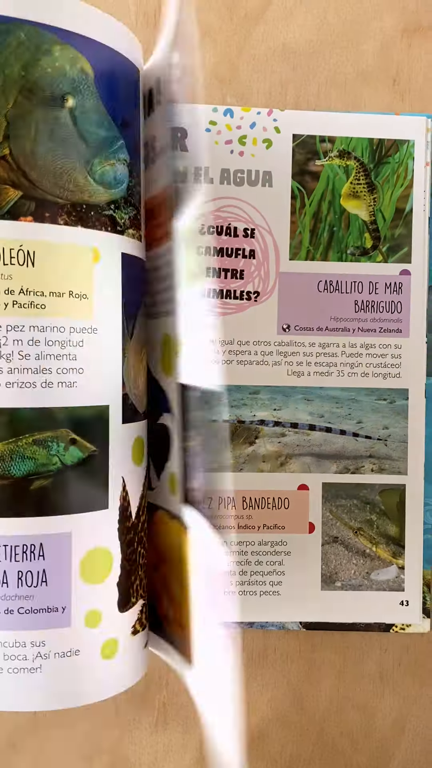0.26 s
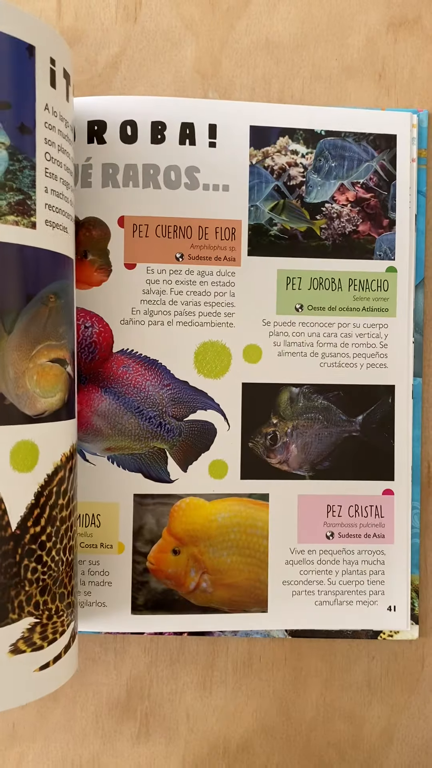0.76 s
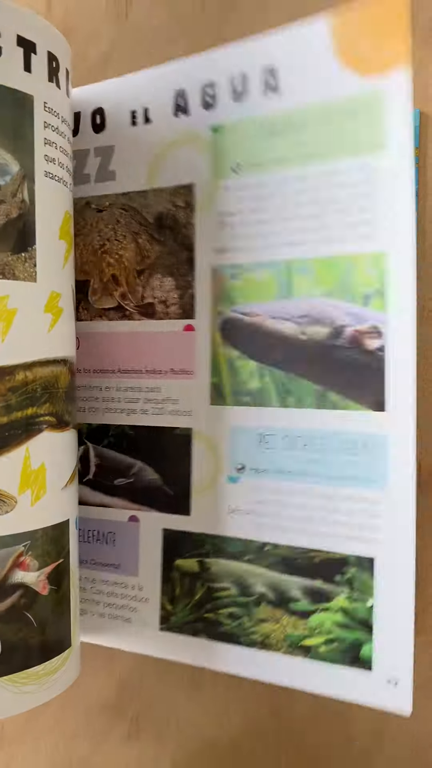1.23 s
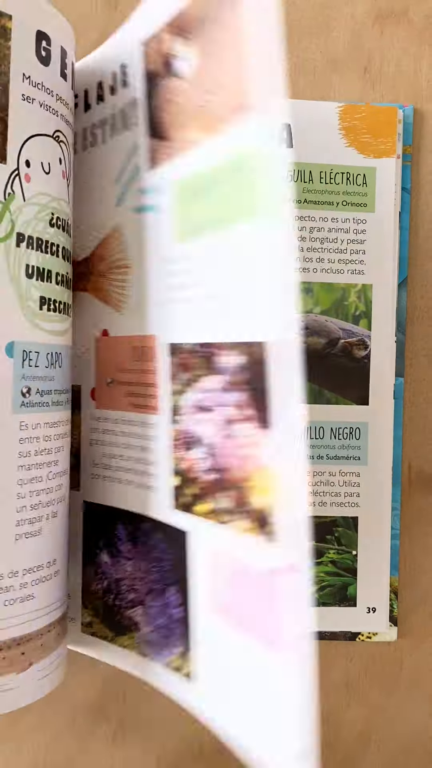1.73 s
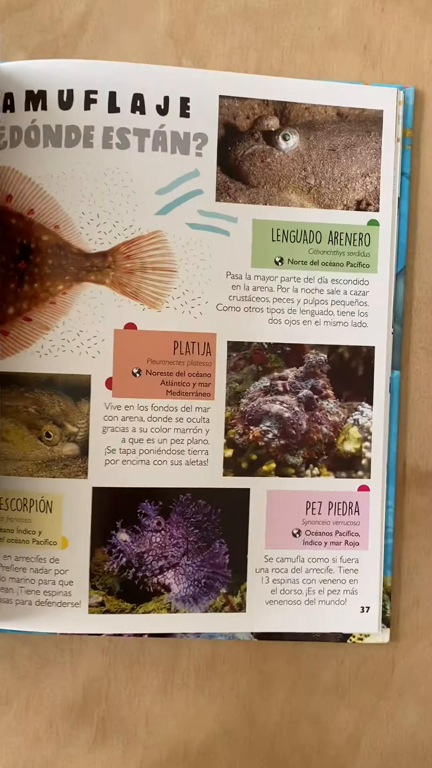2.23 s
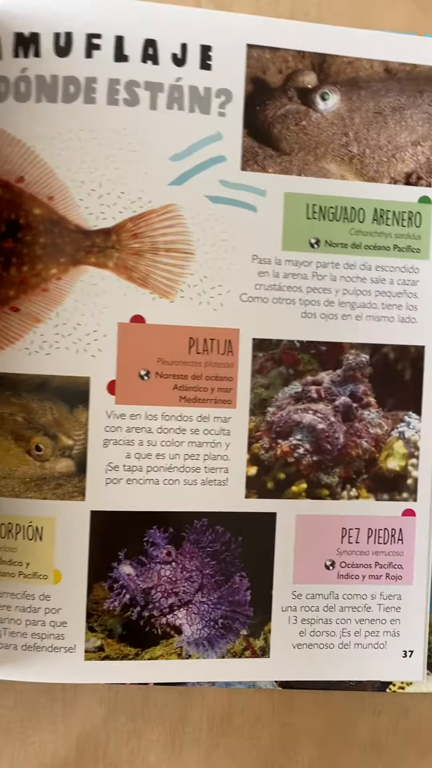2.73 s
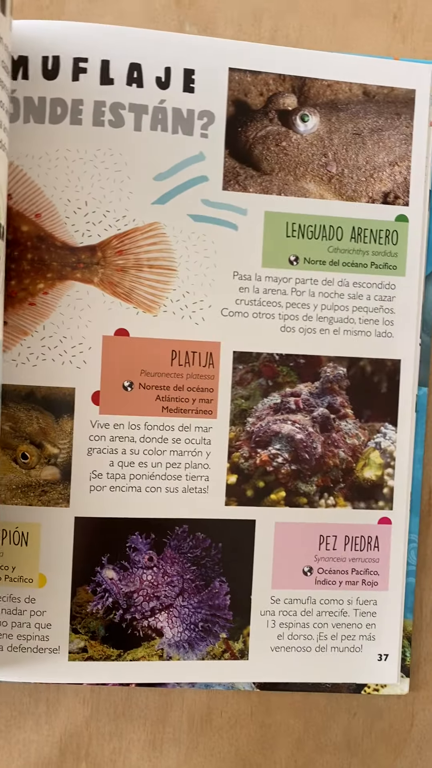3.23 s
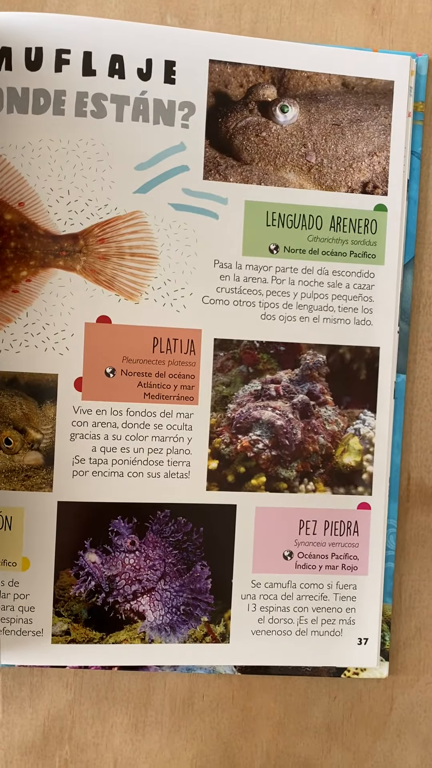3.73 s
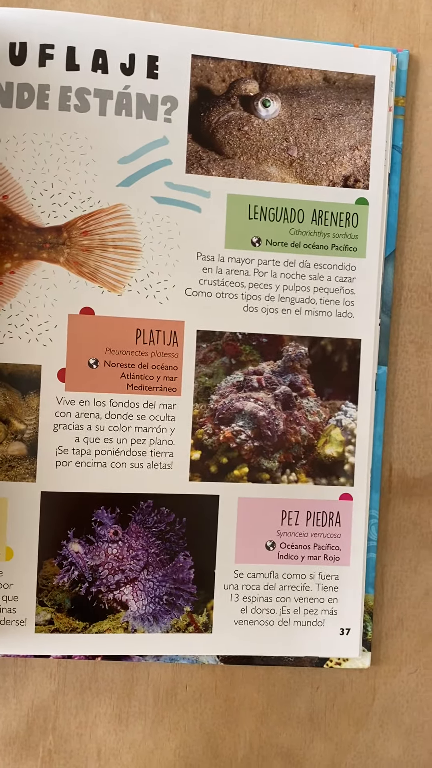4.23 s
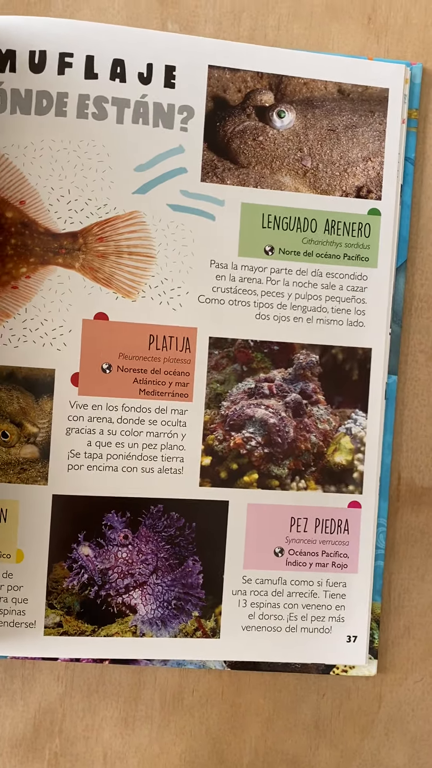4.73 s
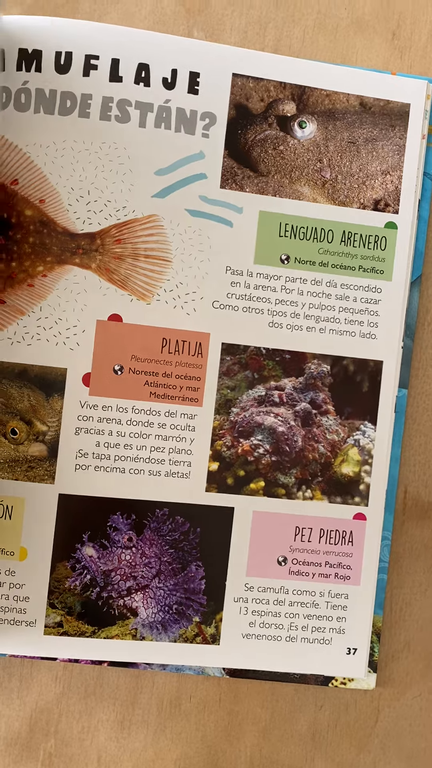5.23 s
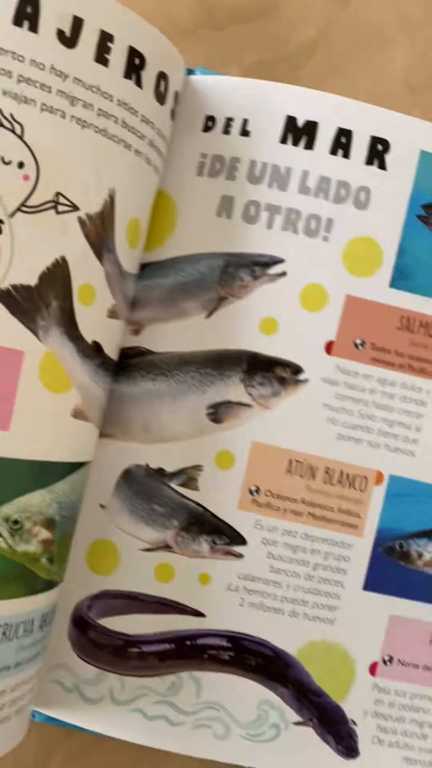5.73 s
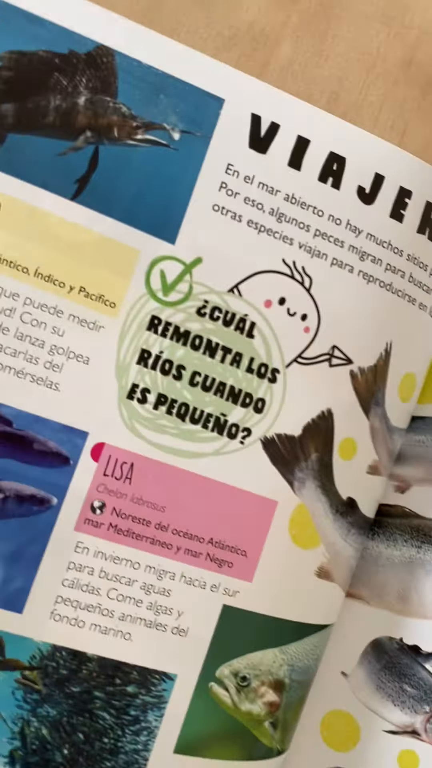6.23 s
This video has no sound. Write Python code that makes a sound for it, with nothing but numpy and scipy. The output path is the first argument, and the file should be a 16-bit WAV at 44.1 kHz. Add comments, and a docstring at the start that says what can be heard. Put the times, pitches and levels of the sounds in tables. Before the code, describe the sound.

Close stereo microphone in a quiet room with faint low rumble. A hand leafs through a glossy picture book on a wooden table: light flicks and rubs at first, then a busy cluster of fingertip stutters and page pops. After a pause, a heavier flick, more papery thumps, a long bright rasp of one sheet over another, a light lift and a loud sharp snap, with small rustles afterward.

```python
"""A low room rumble first, then paper being rubbed, a puff of air and a page edge flicking:
a hand leafs through a glossy picture book on a wooden table, close to a stereo microphone in a quiet room.
Flicks, slips and snaps are short pushes ringing in a sheet's resonances; rubbing and sliding are shaped noise.
Moving pages push low swings of air. The last sheet rasps, is lifted and snaps taut with a loud crack.
The room answers the paper sounds with a diffuse echo."""
import sys
import numpy as np
from scipy import signal
from scipy.fft import rfft, irfft, next_fast_len
from scipy.io import wavfile
from scipy.ndimage import uniform_filter1d, map_coordinates

SR = 44100
rng = np.random.default_rng(int(sys.argv[2]) if len(sys.argv) > 2 else 0)


def transcribe(u):
    """Save the signal u as a 16-bit wav file named by the first command-line argument.

    u: samples, shape (n,) or (channels, n), limited to [-1, 1]; the rate is SR.
    q: integer samples, one column per channel.
    """
    v = np.clip(np.atleast_2d(u).T, -1, 1)
    q = np.round(v * 32767).astype(np.int16)
    wavfile.write(sys.argv[1], SR, q)


N = 285327
SIZE = 8192  # samples in one short push
TIME = np.arange(N) / SR
BLOW_HZ = np.fft.rfftfreq(SIZE, 1 / SR)

# steady room floor: spectrum of the faint hush: (frequency_hz, level_db_per_hz)
HUSH_COLOUR = [(30, -7), (200, -0.5), (450, -3.5), (850, -3), (1400, -7.5), (2200, -7.5), (3200, -13),
               (5000, -13), (7000, -17), (16000, -38.5)]
# spectrum of low moving air, for the room rumble and the eddies: (frequency_hz, level_db_per_hz)
LOW_AIR_COLOUR = [(20, -23.5), (35, -12), (50, 0.5), (70, 0.5), (100, -2), (135, -5.5), (180, -12.5),
                  (260, -22), (400, -30.5), (1000, -72), (4000, -77)]
ROOM_RUMBLE_DB, ROOM_HUSH_DB = -59.5, -80
RUMBLE_RISE_S = 0.065  # the rumble sets in as the hand takes hold of the book

# rubbing and hissing noise: sliding over paper, and a fading hiss after the snap:
# (start_s, length_s, dull_rub_db, bright_hiss_db, start_to_end_swell_db)
RUBBINGS = [(0.11, 0.12, -64, -88, -22), (0.464, 0.071, -71, -87, 6), (0.824, 0.069, -59, -73, -11),
            (0.99, 0.18, -81.5, -95, 6), (1.496, 0.056, -58, -98, -9), (1.866, 0.073, -61.5, -80, 14),
            (1.92, 0.051, -63.5, -63.5, -2), (1.99, 0.18, -75.5, -100, -4), (2.191, 0.036, -51, -59, -2.5),
            (2.289, 0.06, -58, -59, -3), (2.44, 0.04, -56, -58, 3), (2.588, 0.064, -55, -61, 0),
            (2.718, 0.017, -53, -62.5, -3), (2.781, 0.16, -76.5, -91, 14), (3.274, 0.11, -69.5, -68.5, 21),
            (3.43, 0.08, -60.5, -84, 9.5), (3.575, 0.09, -63.5, -92, 1), (3.7, 0.11, -66, -72, -6),
            (3.8, 0.06, -57, -70, 4), (3.877, 0.19, -69.5, -98, 2), (4.05, .085, -57.5, -64, 9),
            (4.134, 0.14, -59, -59.5, -2), (4.264, 0.27, -53.5, -72, 3), (4.494, 0.046, -47, -63, -1),
            (4.595, 0.11, -63.5, -79, -6.5), (5.427, 0.06, -58, -62.5, 17.5),
            (5.503, 0.24, -74.5, -67.5, -21), (5.773, 0.21, -71, -68, -1), (6.025, 0.16, -75.5, -75.5, -9)]
# spectrum of the dull rub: (frequency_hz, level_db_per_hz)
RUB_COLOUR = [(30, -22), (100, 7.5), (250, 0.5), (480, -1), (720, 2.5), (1000, -4.5), (1400, -8.5),
              (2000, -9.5), (2900, -13), (4200, -19), (9000, -55)]
# spectrum of the bright hiss: (frequency_hz, level_db_per_hz)
HISS_COLOUR = [(500, -20), (1400, -2), (2700, 1), (4000, -2), (5300, -1), (7000, 0), (9000, -5),
               (11000, -7.5), (13500, -10.5), (16000, -14)]
STROKE_ATTACK_S = .018
HISS_FADE_DB_PER_S, RUB_FADE_DB_PER_S = 559, 362  # the hiss dies faster at the end
CRACKLE_PER_S, CRACKLE_SHARE = 1600, .45  # mean rate of separate fibre catches, their share of the power

# a moving page pushes air: (time_s, push_energy_db, eddy_level_db)
PUFFS = [(0.116, -28, -48), (0.178, -28, -55), (2.221, -27, -53), (2.3, -26.5, -53.5), (2.34, -24, -63),
         (2.471, -15, -57), (2.645, -17, -49.5), (3.505, -18, -52), (3.833, -8.5, -51.5), (4.075, -39, -68),
         (4.536, -12.5, -53), (4.758, -20.5, -54), (5.488, -30.5, -54), (6.276, -26.5, -70),
         (6.451, -23, -45.5)]
# swing of the air under a falling page: (centre_hz, width_hz, level_db)
AIR_MODES = [(53.6, 38, 27), (106, 33, 5), (228, 200, -6.5)]
PUFF_LOW_HZ, PUFF_SOFT_HZ = 38.7, 700  # the slowest flow escapes round the page; moving air has no sharp edge
EDDY_RISE_S, EDDY_FADE_DB_PER_S = 0.021, 41

# a page edge flicks or lands, or a fingertip slips loudly:
# (time_s, body_energy_db, crisp_edge_energy_db, page_pitch_ratio, glide_cycles)
FLICKS_AND_LOUD_SLIPS = [(0.1266, -23.5, -33, 1.19, 1.97), (.487, -36, -59, 0.9, 2),
                         (0.517, -47, -39.5, 1.8, 1), (0.848, -35, -29, 2, 1.5),
                         (1.508, -21.5, -27, 1.08, 1.8), (1.928, -24.5, -39, 0.8, 2.4),
                         (2.084, -23.5, -38, 0.76, 1.97), (2.182, -33.5, -67, 0.72, 2),
                         (2.214, -20, -38, 1.1, 2), (2.239, -30.5, -33, 2.7, 1), (2.298, -33, -33, 1, 1),
                         (2.379, -28.5, -31, 0.98, 0.9), (2.386, -29.5, -30, 1, 0.9),
                         (2.395, -28.5, -30, 1.1, 0.97), (2.4325, -20, -23.5, 1, 2.26),
                         (2.441, -23, -25.5, 1.1, 2), (2.4659, -7.5, -35, 0.915, 2.2),
                         (2.486, -22, -54, .6, 2), (2.591, -19.5, -25.5, 0.97, 2),
                         (2.644, -15.5, -28.5, 0.9, 2.02), (2.662, -26, -56, 0.48, 2),
                         (2.736, -24.5, -49, 0.8, 2.3), (3.4905, -22.5, -36.5, 0.97, 2.47),
                         (3.508, -31.5, -36.5, 0.63, 4), (3.606, -27, -52, 0.85, 1.5),
                         (3.684, -26.5, -40, 0.92, 1.5), (3.693, -22.5, -28, 1.08, 1.5),
                         (3.8314, -1, -17.5, 0.95, 1.6), (3.847, -18, -50, .8, 2),
                         (3.864, -20, -55, .45, 2), (4.002, -35.5, -58, 0.85, 2),
                         (4.526, -10.5, -23, 0.96, 3.36), (4.537, -16.5, -34, 0.86, 5.2),
                         (4.552, -13, -37, 0.8, 2.6), (4.618, -22.5, -50, 0.6, 2),
                         (4.637, -16, -38.5, 0.85, 2.4), (4.652, -13, -38, 0.85, 2.27),
                         (4.668, -15, -42.5, 0.84, 2.13), (4.696, -16, -40, 0.64, 2.75),
                         (4.753, -16, -35, 0.83, 2.83), (4.765, -11, -44, 0.95, 2),
                         (5.4774, -32.5, -15, 1.1, 0.95), (5.797, -36, -52, .8, 2),
                         (5.894, -30.5, -23, 2.24, 1), (5.945, -34, -43.5, 1.7, 1.97),
                         (6.269, -34, -66, 0.95, 3.09), (6.282, -34, -64, 1, 2),
                         (6.441, -27, -67.5, 1.3, 2), (6.446, -21.5, -63, 1.57, 2)]
# resonances of a held page at pitch ratio 1: (centre_hz, width_hz, level_db)
PAGE_MODES = [(270, 580, 2), (518, 200, 11), (740, 100, 16), (1800, 430, -1), (2800, 450, -2)]
# spectrum of a click: (frequency_hz, level_db_per_hz)
EDGE_COLOUR = [(300, -30), (1200, -6), (2500, 0), (4000, -2), (7300, -1), (10000, -7), (14000, -8),
               (16500, -15)]
# the facing page reflects each click and gives it a banded colour; the delay is that at pitch ratio 1
EDGE_ECHO_S, EDGE_ECHO_SHARE = .001, .4

# narrow bands of friction noise: passing pages, rubbing, and resonances of the sliding sheet:
# (start_s, length_s, centre_hz, width_hz, level_db, glide_octaves)
FRICTION_BANDS = [(0.385, 0.23, 294, 300, -65, .4), (0.506, 0.13, 3130, 1610, -69.5, -0.4),
                  (0.885, 0.39, 1830, 1000, -81, -0.38), (1.019, 0.12, 3760, 700, -78, 0),
                  (1.756, 0.17, 744, 587, -69, 0.18), (1.863, 0.21, 380, 500, -59.5, -0.075),
                  (1.916, 0.075, 2870, 1000, -67, -0.18), (2.08, 0.073, 850, 800, -66, -0.59),
                  (2.297, 0.077, 2300, 1700, -58, -.8), (2.866, 0.18, 2790, 1220, -77.5, 0.4),
                  (3.335, 0.08, 3100, 1200, -65, 0), (4.22, 0.2, 3100, 2200, -63.5, -.3),
                  (4.36, 0.24, 500, 455, -55.5, -.4), (4.86, 0.15, 550, 600, -49, 0.2),
                  (4.95, 0.1, 1150, 350, -50, 0), (4.84, 0.09, 4270, 350, -50.5, -.05),
                  (4.925, 0.13, 6650, 450, -53, 0), (4.985, 0.07, 2400, 300, -49, -.1),
                  (5.06, 0.09, 2850, 500, -57, -.2), (5.891, 0.05, 1740, 710, -60.5, 0.18)]

# a fingertip drags over the page it presses: (start_s, length_s, level_db, start_to_end_swell_db, treble_edge_hz)
DRAGS = [(1.93, 0.05, -63, 0, 9000), (3.294, 0.095, -62.5, 14, 9000), (3.454, 0.044, -72, 11, 3000),
         (3.597, 0.042, -61, -7, 1690), (3.686, 0.042, -49.5, -7, 3500), (4.035, 0.03, -60, 6, 2800),
         (4.058, 0.07, -49.5, 3, 2500), (4.124, 0.13, -58, -10, 2800)]
# resonances of the page under a fingertip: (centre_hz, width_hz, level_db)
FINGER_MODES = [(680, 280, 2), (1150, 250, -5), (1900, 300, 1.5), (2700, 400, -5.5), (3600, 450, -6.5),
                (4500, 400, -11), (5750, 400, -12), (7150, 850, -6.5), (10200, 1500, -13),
                (13500, 2000, -15)]

# stick-slip runs of a fingertip:
# (start_s, end_s, first_slips_per_s, last_slips_per_s, body_energy_db, edge_energy_db), energies per slip
SLIPS = [(1.935, 1.984, 260, 200, -42, -38), (2.088, 2.097, 300, 250, -42, -45),
         (2.302, 2.346, 230, 300, -37, -33.5), (2.349, 2.375, 290, 200, -28.5, -28.5),
         (2.446, 2.464, 330, 280, -28, -27), (2.597, 2.642, 300, 230, -30, -31),
         (2.648, 2.661, 330, 300, -42, -36), (3.612, 3.667, 190, 150, -38, -50),
         (3.699, 3.749, 180, 210, -27.5, -29.5), (3.754, 3.792, 100, 190, -36, -30),
         (3.797, 3.823, 180, 140, -29.5, -26.5), (4.518, 4.536, 540, 430, -17.5, -40.5)]
# resonances of the paper as it crinkles at each slip, before each slip's bend: (centre_hz, width_hz, level_db)
CRINKLE_MODES = [(720, 260, 0), (1900, 400, 1), (2850, 600, 0), (3750, 450, -7), (7100, 1400, -10),
                 (10200, 1500, -19), (13200, 2000, -23)]
# unevenness of the slips: share of their spacing, their force, share of the page's pitch
SLIP_JITTER, SLIP_SCATTER_DB, SLIP_BEND = .18, 2.5, .11

# one whole sheet drawn across the next: (time_s, level_db, treble_relative_to_lows_db)
SLIDE = [(4.777, -52, 4), (4.785, -47, 9.5), (4.804, -40.5, 0.5), (4.86, -41.5, -2), (4.899, -43, 1.5),
         (4.955, -39, 0), (4.98, -45, 1), (5.02, -49, 6), (5.058, -52, 5), (5.071, -54.5, -2),
         (5.1, -51, -12.5), (5.164, -73, -12.5)]
# spectrum of the sliding sheet's rasp: (frequency_hz, level_db_per_hz)
SHEET_COLOUR = [(150, -15), (400, -4), (720, -1), (1100, -2), (2000, -4), (2800, -3), (4200, -5.5),
                (5400, -7.5), (7000, -5), (9000, -10), (11000, -13), (16000, -23)]
# resonances of the arched sheet, before its pitch glide: (centre_hz, width_hz, level_db)
ARCH_MODES = [(780, 240, 0), (1750, 260, 2), (2750, 380, 2), (4430, 330, 7), (5800, 400, -4),
              (7100, 500, 0), (10300, 2000, -14), (14200, 2000, -16)]
ARCH_SPRING_OCT, ARCH_SPRING_S = .25, .025
ARCH_SAG_OCT_PER_S = .4
ARCH_RING_DB, ARCH_FADE_DB_PER_S = 8, 62  # ringing relative to the rasp

# the last sheet is peeled up and brushes its neighbour: (start_s, length_s, level_db, start_to_end_swell_db)
LIFT = (5.204, 0.18, -54.5, -2)
# resonances of the lifted sheet: (centre_hz, width_hz, level_db)
LIFTED_MODES = [(720, 380, 5), (1200, 350, 2), (1800, 400, -2.5), (2750, 520, 0), (3600, 500, -5),
                (5300, 700, -1), (6200, 400, -2.5), (7050, 520, .5), (10000, 1500, -10), (14000, 2000, -13)]

# a sheet snaps taut: (time_s, energy_db)
SNAPS = [(5.4856, 8), (5.4953, -11.5)]
# resonances of the taut sheet at pitch ratio 1: (centre_hz, width_hz, level_db)
TAUT_MODES = [(745, 40, -19), (970, 95, 7), (1159, 71, 18), (2010, 800, 2), (2754, 730, -9),
              (3925, 1700, 2.5), (7600, 3500, -15), (14500, 1900, -18.5)]
# spectrum of the crack thrown into the room: (frequency_hz, level_db_per_hz)
CRACK_COLOUR = [(150, -11), (450, -8.5), (1000, -2), (1500, -3), (2700, 0.5), (4000, -1.5), (7000, -7.5),
                (9000, -29.5), (11000, -25.5), (16000, -30.5)]

# left-right phase given to the near sound at offset 1; around 8.6-11.7 kHz left and right stand opposed, as
# across the whole scene: # (frequency_hz, left_lead_radians)
NEAR_PHASE = [(100, 0), (350, .25), (750, .45), (1700, .65), (3000, 1.7), (4500, 2.0), (7700, 2.25),
              (8600, 3.0), (11700, 3.25), (12800, 4.0), (15000, 4.7)]
# left-right level given to the near sound: (frequency_hz, left_minus_right_db)
NEAR_BALANCE = [(60, -.5), (200, -2.5), (380, -1), (680, 5), (1300, 2.5), (2500, -1), (5000, -.5),
                (8500, 0), (15000, .5)]
# stereo coherence given to the diffuse tail; around 8.6-11.7 kHz left and right stand nearly opposed, as across
# the whole scene: # (frequency_hz, coherence)
TAIL_COHERENCE = [(100, .95), (300, .45), (700, .3), (1400, .45), (3000, -.1), (7800, -.35), (8600, -.99),
                  (11700, -.99), (13000, -.45)]
# time the room's echo takes to fall 60 dB: (frequency_hz, t60_s)
ROOM_T60 = [(100, 0.73), (400, 0.37), (1200, 1), (3000, 0.67), (6000, 0.47), (14000, 0.44)]
TOP_HZ = 16100


def amp(db):
    """Decibels to gain."""
    return 10 ** (np.asarray(db) / 20)


def unit(x):
    """Scaled to rms 1."""
    return x / np.sqrt(np.mean(x ** 2) + 1e-20)


def along(points, hz):
    """(frequency_hz, value) points read on a log frequency axis."""
    f, v = np.transpose(points)
    return np.interp(np.log(hz + 1), np.log(f + 1), v)


def curves(rows):
    """One value per sample for each column after the time."""
    s, *columns = np.transpose(rows)
    return [np.interp(TIME, s, column) for column in columns]


def wobble(rate):
    """A random curve of straight pieces, rate knots a second."""
    knots = rng.standard_normal(int(N * rate / SR) + 4)
    return map_coordinates(knots, [TIME * rate], order=1)


def filtered(x, response):
    """x times a complex response of frequency."""
    n = x.shape[-1]
    m = next_fast_len(n + SIZE)
    return irfft(rfft(x, m) * response(np.fft.rfftfreq(m, 1 / SR)), m)[..., :n]


def noise(spectrum, patchy_db, size=12):
    """Noise of rms 1 whose colour shifts in small patches, each size frames long."""
    z = signal.stft(rng.standard_normal(N), nperseg=512)[2]
    field = uniform_filter1d(rng.standard_normal(z.shape), size=5, axis=0)
    field = uniform_filter1d(field, size=size, axis=1)
    patchy = signal.istft(z * amp(patchy_db * unit(field)), nperseg=512)[1][:N]
    return unit(filtered(patchy, lambda hz: amp(along(spectrum, hz))))


def crackle():
    """Friction: a smooth rush, with a share of its power in tiny separate catches of the fibres."""
    catches = rng.standard_normal(N) * (rng.random(N) < CRACKLE_PER_S / SR)
    rush = rng.standard_normal(N)
    return np.sqrt(1 - CRACKLE_SHARE) * rush + np.sqrt(CRACKLE_SHARE) * unit(catches)


def ringing(modes):
    """Friction of rms 1 in a set of resonances."""
    def power(hz):
        return sum(amp(db) ** 2 / (1 + ((hz - c) / w) ** 2 * 2) ** 2 for c, w, db in modes)
    return unit(filtered(crackle(), lambda hz: np.sqrt(power(hz))))


def glide(x, octaves):
    """x with its pitch shifted by a number of octaves for each sample."""
    return map_coordinates(x, [np.cumsum(2 ** octaves)], mode="wrap")


def gesture(start, length, attack, swell_db, fade_db_per_s):
    """Gain of one movement: a quick attack, a hold that swells or sags, then a fade."""
    t = TIME - start
    held = np.clip(t / length, 0, 1) - .5
    fade_db = fade_db_per_s * np.maximum(t - length, 0)
    return np.clip(t / attack, 0, 1) ** 2 * amp(swell_db * held - fade_db)


def causal(spectrum):
    """The minimum-phase response with the given colour."""
    cepstrum = irfft(np.log(amp(along(spectrum, BLOW_HZ))))
    fold = np.r_[1, np.full(SIZE // 2 - 1, 2), 1, np.zeros(SIZE // 2 - 1)]
    return np.exp(rfft(cepstrum * fold))


def resonances(modes, pitch):
    """A sheet's response; its modes move together as the paper bends."""
    f = BLOW_HZ / pitch
    return sum(amp(db) * 1j * f * w / (c * c - f * f + 1j * f * w) for c, w, db in modes)


def page(pitch, soft_hz):
    """A held page, set moving by a soft finger."""
    return resonances(PAGE_MODES, pitch) / (1 + 1j * BLOW_HZ / soft_hz) ** 2


def impulse(response):
    """The sound of a frequency response, with energy 1 and its onset in the middle."""
    sound = np.fft.fftshift(irfft(response)) * signal.windows.tukey(SIZE, .5)
    return sound / np.linalg.norm(sound)


def blow(response, cycles, scatter, t60):
    """One push on a sheet: the lows lag the treble, so the pitch falls; the page's edges scatter a part."""
    t = np.arange(SIZE) / SR
    push = scatter * unit(rng.standard_normal(SIZE) * amp(-60 * t / t60)) / np.sqrt(SIZE)
    push[0] += 1
    lag = np.exp(-2j * np.pi * cycles * np.log((1 + BLOW_HZ / 60) / (1 + BLOW_HZ / 2000)))
    return impulse(rfft(push) * response * lag)


def add(track, s, sound):
    """Mix a sound in with its middle at s seconds."""
    part = track[max(0, round(s * SR) - len(sound) // 2):][:len(sound)]
    part += sound[:len(part)]


def floor():
    """The quiet room: a low, uneven rumble under a faint, even hush."""
    rise = np.clip(TIME / RUMBLE_RISE_S, .2, 1)
    rumble = rise * amp(ROOM_RUMBLE_DB + 0.81 * wobble(4.4)) * noise(LOW_AIR_COLOUR, patchy_db=2.0)
    return rumble + amp(ROOM_HUSH_DB) * noise(HUSH_COLOUR, patchy_db=1.5)


def rubbings():
    """A dull rub and a fine-grained hiss of uneven strength: sliding over paper, and a fading hiss after the snap."""
    rub_power, hiss_power = np.zeros(N), np.zeros(N)
    for s, length, rub_db, hiss_db, swell_db in RUBBINGS:
        rub_gain = amp(rub_db) * gesture(s, length, STROKE_ATTACK_S, swell_db, RUB_FADE_DB_PER_S)
        hiss_gain = amp(hiss_db) * gesture(s, length, STROKE_ATTACK_S, swell_db, HISS_FADE_DB_PER_S)
        rub_power += rub_gain ** 2
        hiss_power += hiss_gain ** 2
    grain_db = 2.2 * wobble(600)
    drift_db = 2.0 * wobble(110)
    unevenness = amp(drift_db + grain_db)
    rub = unit(noise(RUB_COLOUR, patchy_db=2.8) * unevenness)
    hiss = filtered(crackle(), lambda hz: amp(along(HISS_COLOUR, hz)))
    return np.sqrt(rub_power) * rub + np.sqrt(hiss_power) * unit(hiss * unevenness)


def puffs():
    """A moving page squeezes out a low, heavily damped swing of air and leaves eddies that die away."""
    out, eddy_power = np.zeros(N), np.zeros(N)
    escape = (1j * BLOW_HZ / (PUFF_LOW_HZ + 1j * BLOW_HZ)) ** 2
    swing = escape * resonances(AIR_MODES, pitch=1) / (1 + 1j * BLOW_HZ / PUFF_SOFT_HZ) ** 2
    for s, push_db, eddy_db in PUFFS:
        add(out, s, amp(push_db) * blow(swing, cycles=0.14, scatter=0.9, t60=0.085))
        eddy_gain = amp(eddy_db) * gesture(s, EDDY_RISE_S, EDDY_RISE_S, 0, EDDY_FADE_DB_PER_S)
        eddy_power += eddy_gain ** 2
    return out + np.sqrt(eddy_power) * noise(LOW_AIR_COLOUR, patchy_db=2)


def flicks_and_loud_slips():
    """An edge or fingertip lets go with a click and the page pops, falling; crisper ones excite higher modes."""
    out, edge = np.zeros(N), causal(EDGE_COLOUR)
    for s, body_db, edge_db, pitch, cycles in FLICKS_AND_LOUD_SLIPS:
        soft_hz = np.clip(12000 * amp(0.75 * (edge_db - body_db)), 900, 12000)
        pop = blow(page(pitch, soft_hz), cycles, scatter=.3, t60=.04)
        add(out, s - .0004, amp(body_db) * pop)
        echo = np.exp(-2j * np.pi * BLOW_HZ * EDGE_ECHO_S / pitch)
        click = blow(edge * (1 + EDGE_ECHO_SHARE * echo), cycles=0.21, scatter=0.78, t60=0.026)
        add(out, s, amp(edge_db) * click)
    return out


def friction_bands():
    """Grainy friction in narrow, gliding bands, from passing pages, rubbing and the sliding sheet's resonances."""
    out = np.zeros(N)
    friction = crackle() * amp(2.5 * wobble(120))
    for s, length, centre, width, db, octaves in FRICTION_BANDS:
        u = np.linspace(0, 1, round(length * SR))
        stretch = friction[round(s * SR):][:SR // 2]
        band = filtered(stretch, lambda hz: 1 / (1 + ((hz - centre) / (width / 2)) ** 2))
        swell = np.sin(np.pi * np.sqrt(u))  # quick rise, longer fade
        add(out, s + length / 2, amp(db) * swell * unit(glide(band, octaves * (u - .5))))
    return out


def drags():
    """Slips too fine to tell apart keep the pressed page ringing; a softer touch gives less treble."""
    out = np.zeros(N)
    rasp = ringing(FINGER_MODES) * amp(2.5 * wobble(500) + 1.5 * wobble(60))
    for s, length, db, swell_db, soft_hz in DRAGS:
        touch = unit(filtered(rasp, lambda hz: 1 / np.sqrt(1 + (hz / soft_hz) ** 2)))
        out += amp(db) * gesture(s, length, STROKE_ATTACK_S, swell_db, RUB_FADE_DB_PER_S) * touch
    return out


def slips():
    """A fingertip catches and lets go of the glossy paper, at an uneven, drifting rate and with uneven force."""
    out = np.zeros(N)
    for start, end, first, last, body_db, edge_db in SLIPS:
        s = start
        # at most 24 slips in a run
        for gap, force_db, bend in rng.standard_normal((24, 3)) * [SLIP_JITTER, SLIP_SCATTER_DB, SLIP_BEND]:
            pitch = np.exp(bend)
            body = amp(body_db) * blow(page(pitch, soft_hz=5000), cycles=1.0, scatter=0.17, t60=0.023)
            crinkle = blow(resonances(CRINKLE_MODES, pitch), cycles=0.24, scatter=0.65, t60=0.007)
            if s <= end:
                add(out, s, amp(force_db) * (body + amp(edge_db) * crinkle))
            s += np.exp(gap) / np.interp(s, [start, end], [first, last])
    return out


def slide():
    """A sheet rasps over its neighbour; its arch's resonances drop as it springs free, then sink and fade."""
    level_db, treble_db = curves(SLIDE)
    start, end = SLIDE[0][0], SLIDE[-1][0]
    elapsed = np.clip(TIME - start, 0, end - start)
    octaves = ARCH_SPRING_OCT * np.exp(-elapsed / ARCH_SPRING_S) - ARCH_SAG_OCT_PER_S * elapsed
    ring = amp(ARCH_RING_DB - ARCH_FADE_DB_PER_S * elapsed)
    rasp = noise(SHEET_COLOUR, patchy_db=4.5, size=4)
    arch = glide(ringing(ARCH_MODES), octaves)
    grain = amp(1.3 * wobble(200) + 1.1 * wobble(1200))
    friction = (rasp + ring * arch) / np.sqrt(1 + ring ** 2) * grain
    # the treble moves against the lows while the overall level is held roughly even
    lows = filtered(friction, lambda hz: 1 / (1 + (hz / 3800) ** 6))
    treble = amp(treble_db)
    friction = (lows + treble * (friction - lows)) / np.sqrt(1 + treble ** 2)
    sliding = gesture(start - STROKE_ATTACK_S, end - start, STROKE_ATTACK_S, 0, RUB_FADE_DB_PER_S)
    return sliding * amp(level_db) * unit(friction)


def peel():
    """The last sheet is lifted: a light, airy brushing in the resonances of the lifted sheet."""
    s, length, db, swell_db = LIFT
    grain = amp(1.6 * wobble(300) + 1.1 * wobble(40))
    lifting = gesture(s, length, STROKE_ATTACK_S, swell_db, HISS_FADE_DB_PER_S)
    return amp(db) * lifting * unit(ringing(LIFTED_MODES) * grain)


def snaps():
    """The lifted sheet buckles through with a loud crack; its face throws a broader sound into the room."""
    near, thrown = np.zeros(N), np.zeros(N)
    dipole = (1j * BLOW_HZ / (750 + 1j * BLOW_HZ)) ** 2  # a free sheet radiates little bass
    taut = resonances(TAUT_MODES, pitch=0.97) * dipole
    for s, db in SNAPS:
        add(near, s - .0004, amp(db) * blow(taut, cycles=1.4, scatter=0.65, t60=.012))
        add(thrown, s, amp(db) * impulse(causal(CRACK_COLOUR)))
    return near, thrown


def near_stereo(x, offset):
    """Gives near sound its left-right phase, scaled by offset, and its left-right level, by frequency."""
    side = np.array([[.5], [-.5]])

    def response(hz):
        phase = side * offset * along(NEAR_PHASE, hz)
        return amp(side * along(NEAR_BALANCE, hz)) * np.exp(1j * phase)
    return filtered(x, response)


def room(x):
    """A diffuse echo in which each frequency dies at its own speed, with a set stereo coherence."""
    hz, t, z = signal.stft(rng.standard_normal((2, SR)), SR, nperseg=256)
    decay = amp(-60 * t / along(ROOM_T60, hz)[:, None])
    tails = signal.istft(z * decay, SR, nperseg=256)[1]
    t = np.arange(tails.shape[1]) / SR
    # table and near walls answer first
    tails = tails * (1 - np.exp(-t / 0.0024)) * (1 + 3.74 * np.exp(-t / 0.029))

    def mid_side(hz):
        turn = np.arccos(np.clip(along(TAIL_COHERENCE, hz), -1, 1)) / 2
        return np.array([np.cos(turn), np.sin(turn)])
    mid, side = filtered(tails, mid_side)
    pair = np.array([mid + side, mid - side])
    return signal.fftconvolve(x[None], pair / np.linalg.norm(pair[0]), axes=1)[:, :N]


def scene():
    """Pages close to the stereo microphone, and the room behind them."""
    ticks = flicks_and_loud_slips() + slips()
    rustle = rubbings() + drags() + slide() + peel() + friction_bands()
    snap, thrown = snaps()
    near = near_stereo(ticks, offset=.95) + near_stereo(snap + rustle + puffs() + floor(), offset=1)
    return near + room(amp(-13.0) * ticks + amp(-9.5) * rustle + amp(-10.0) * thrown)


def record(dry):
    """The microphone chain cuts off steeply above its band limit."""
    return filtered(dry, lambda hz: 1 / np.sqrt(1 + (hz / TOP_HZ) ** 160))


dry = scene()
out = record(dry)
transcribe(out)
```